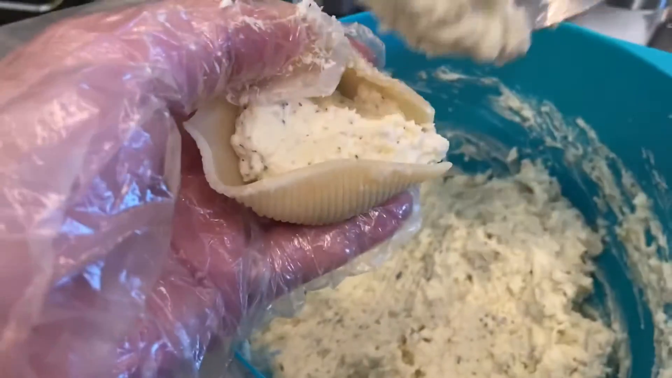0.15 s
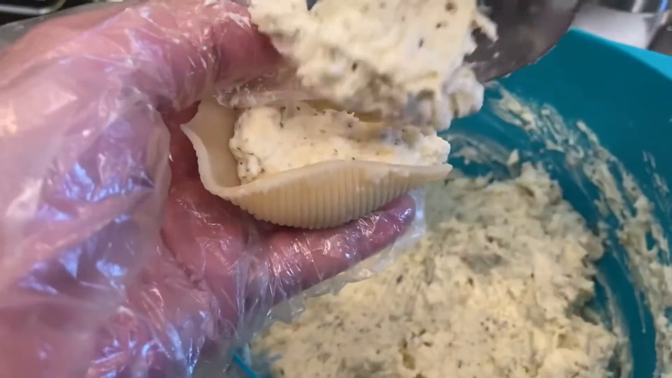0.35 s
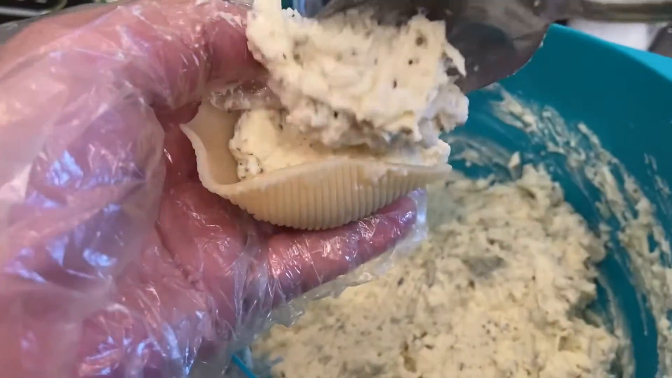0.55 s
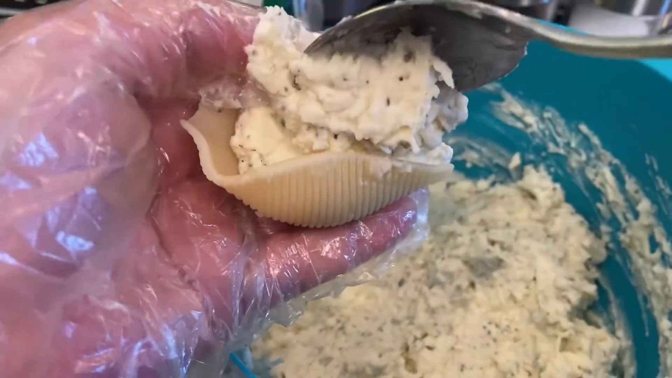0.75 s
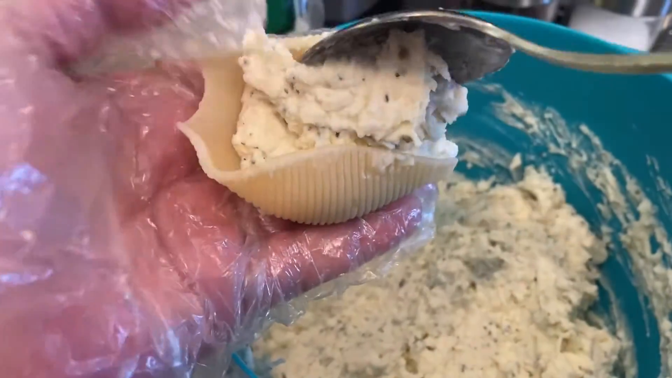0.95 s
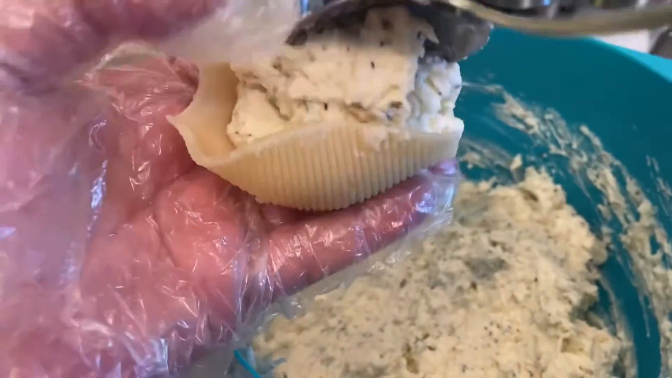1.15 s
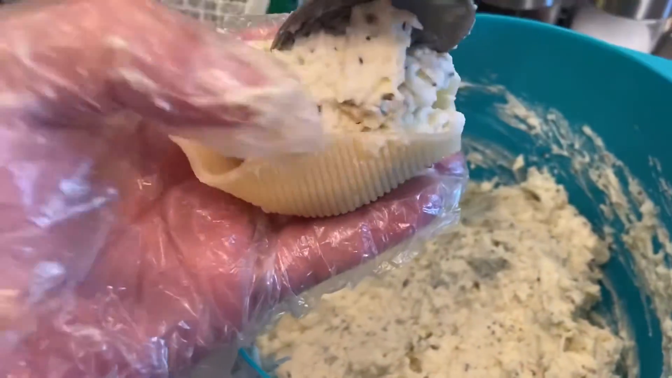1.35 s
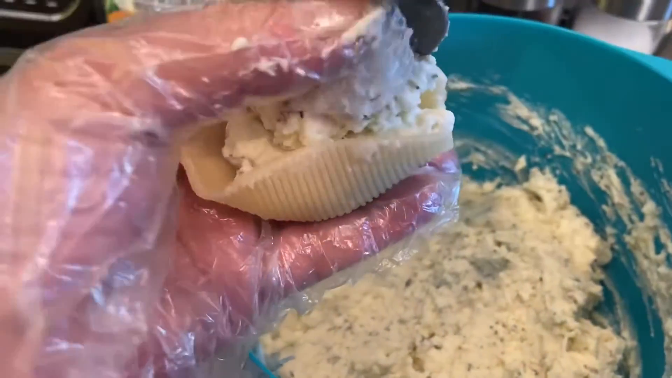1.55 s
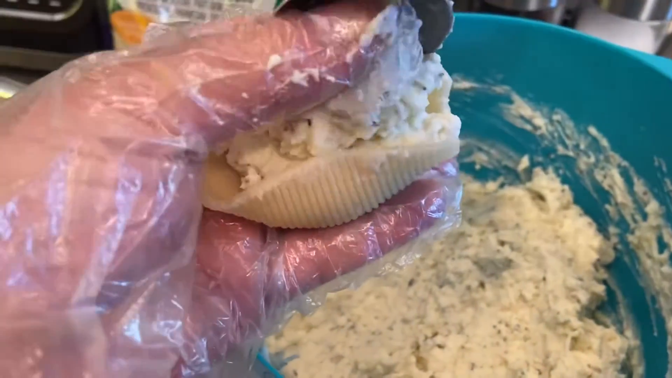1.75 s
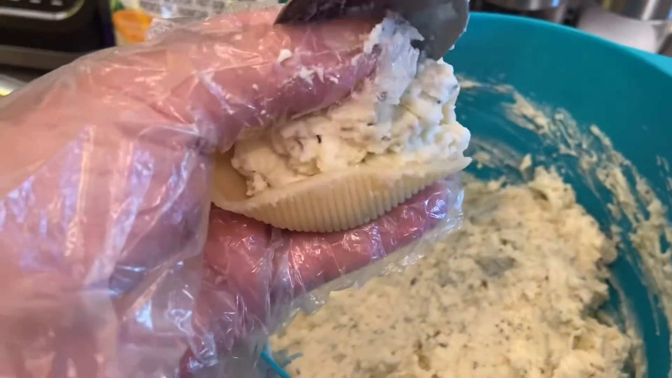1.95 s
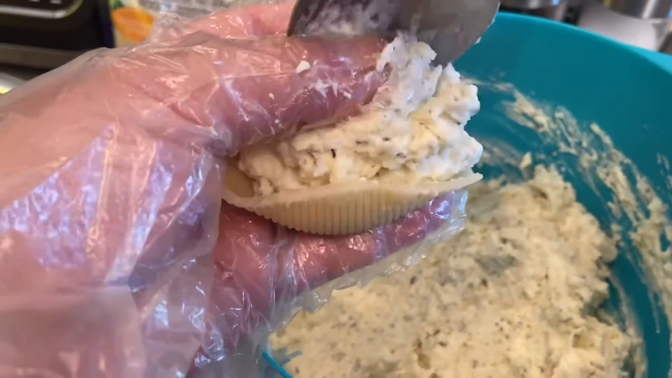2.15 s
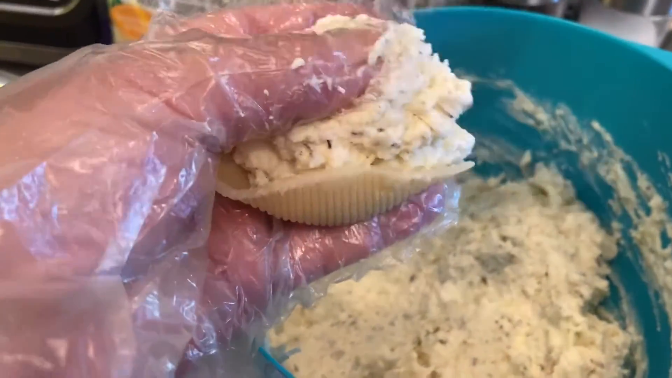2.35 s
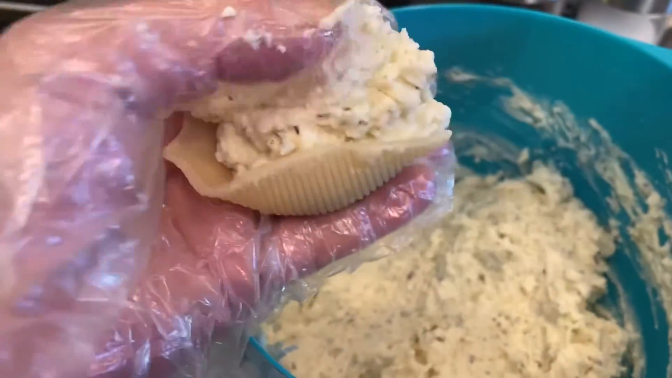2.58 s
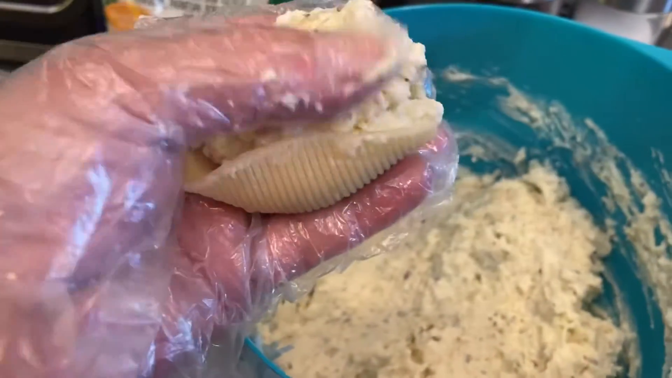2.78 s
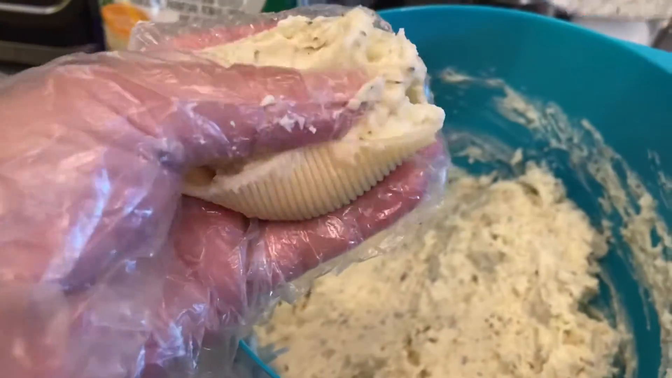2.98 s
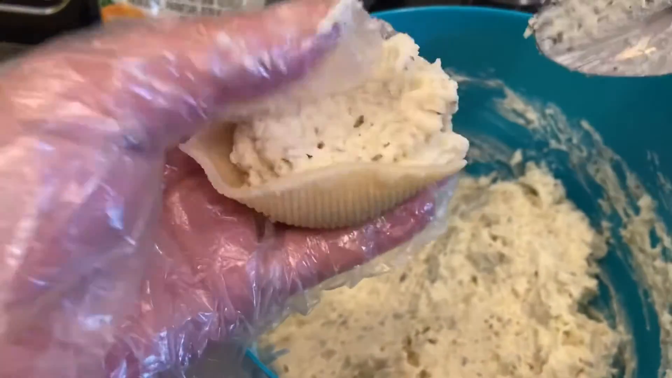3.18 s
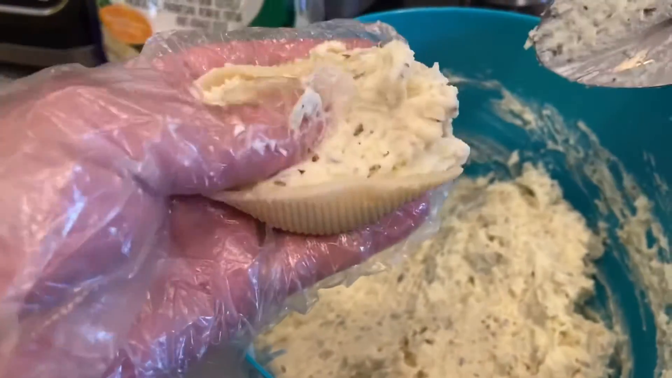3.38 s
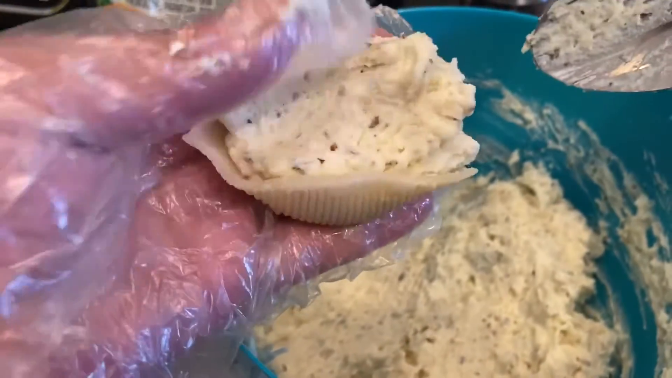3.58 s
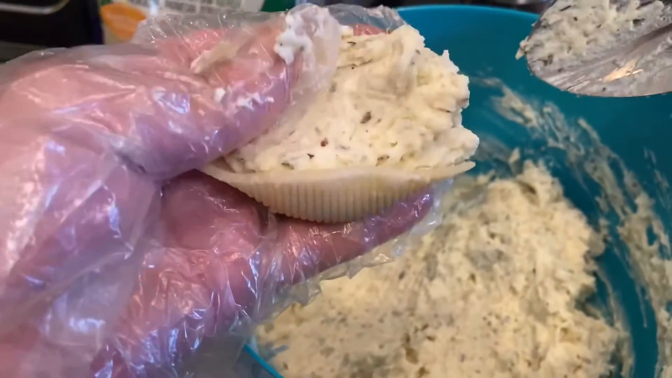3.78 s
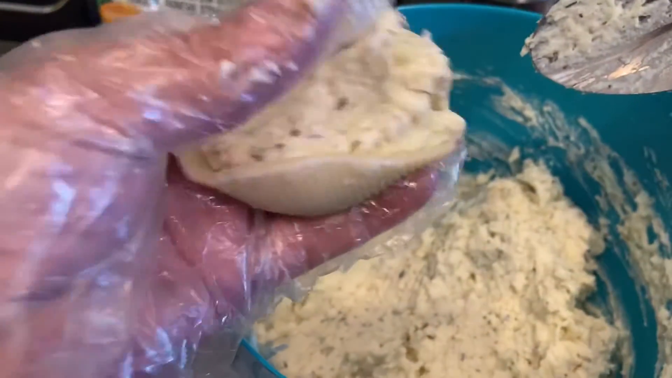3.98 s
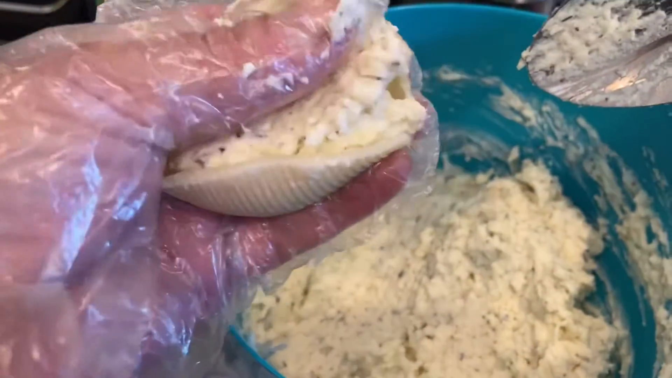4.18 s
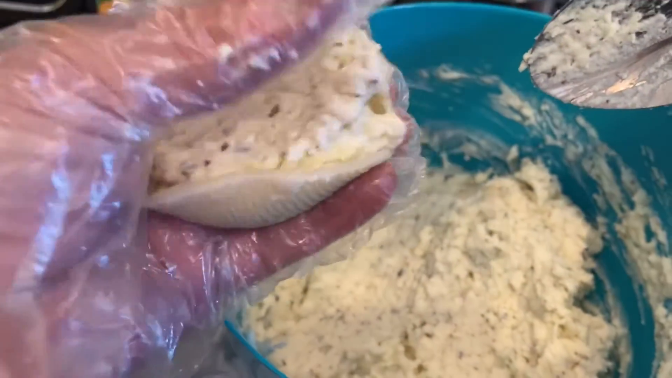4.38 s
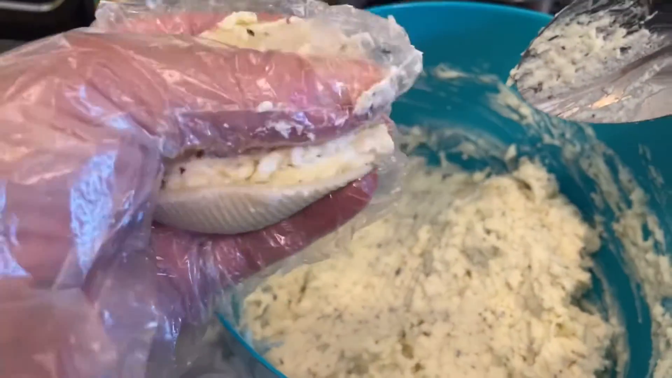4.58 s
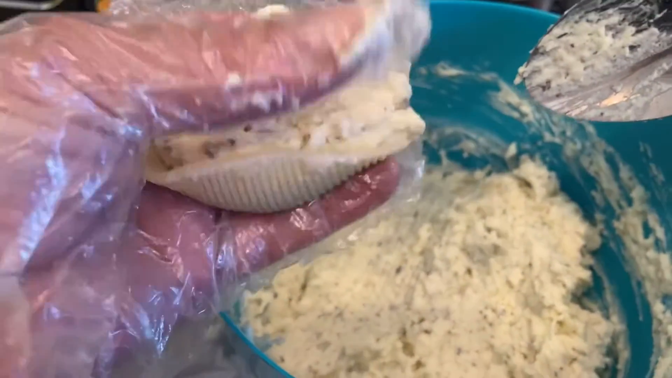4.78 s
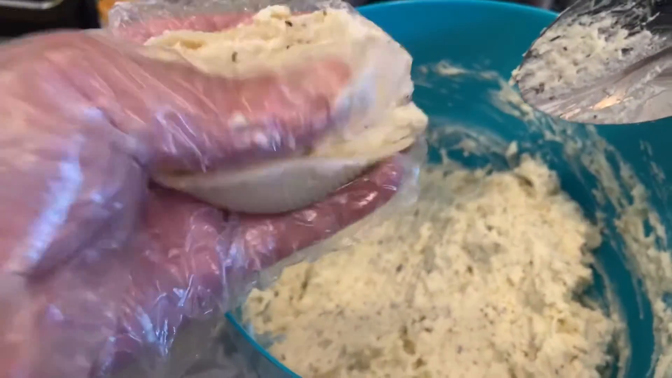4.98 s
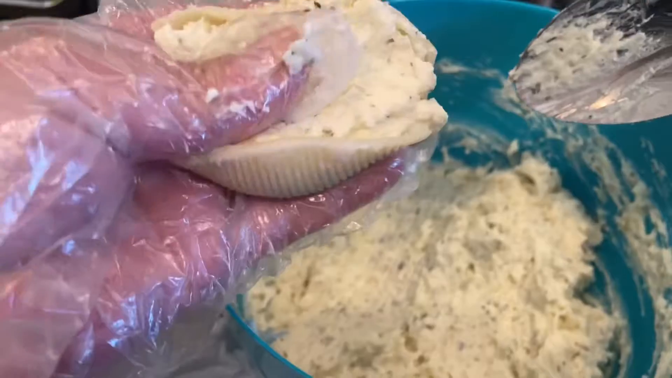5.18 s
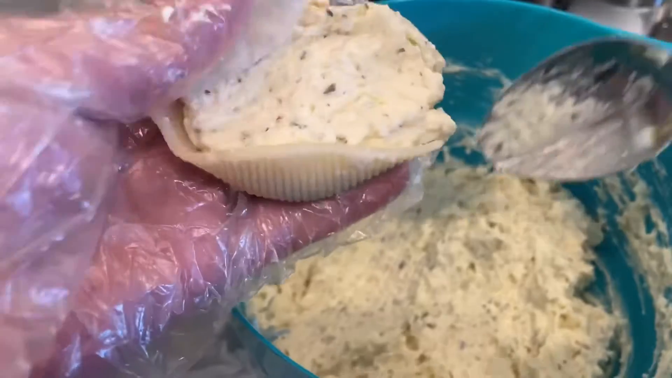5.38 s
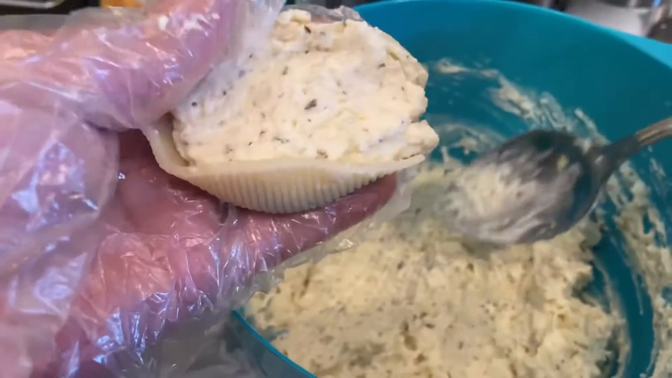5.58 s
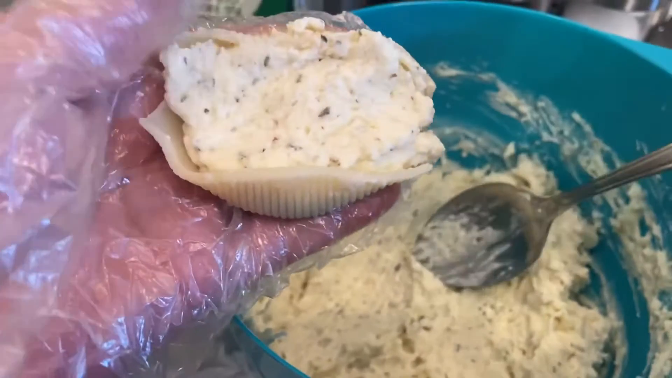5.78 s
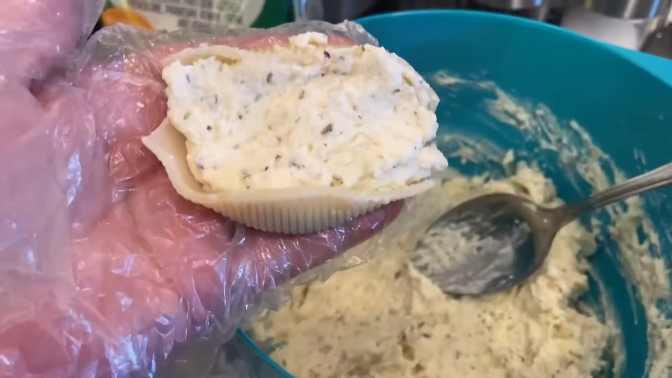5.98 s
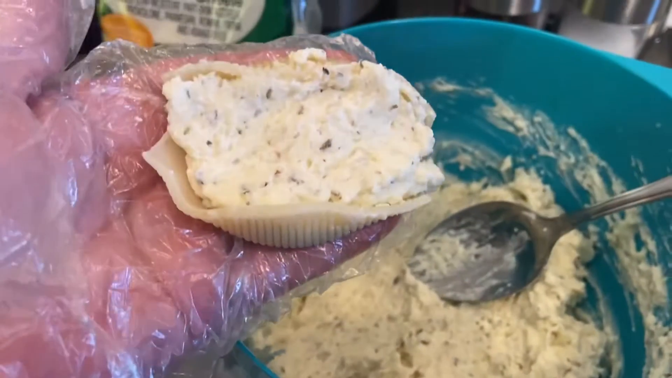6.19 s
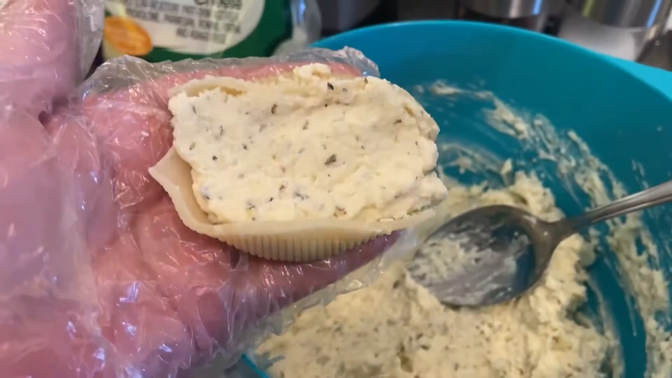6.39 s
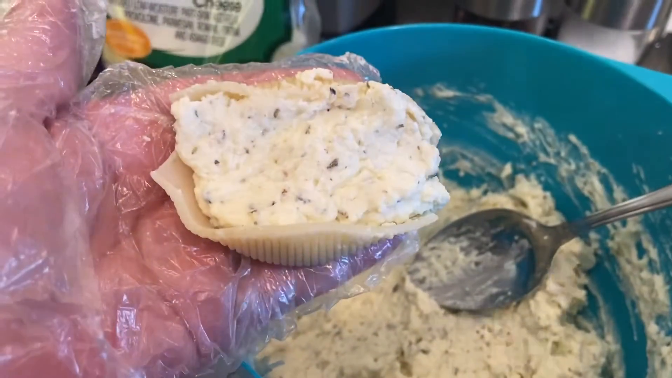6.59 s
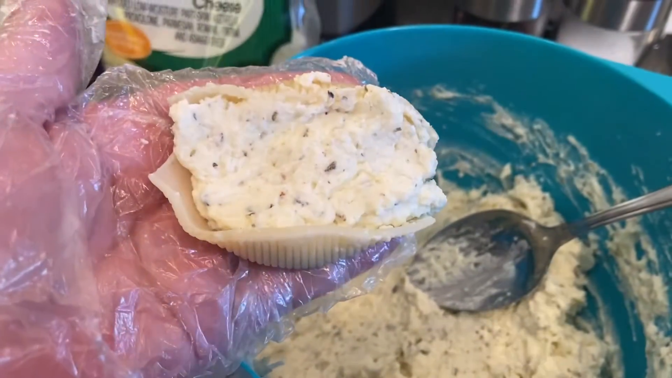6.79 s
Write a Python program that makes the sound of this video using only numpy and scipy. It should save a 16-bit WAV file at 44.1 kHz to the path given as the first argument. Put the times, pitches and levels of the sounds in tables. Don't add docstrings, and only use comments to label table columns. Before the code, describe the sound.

Thin plastic glove crackles and fizzes as a thumb smears thick cheese filling into a pasta shell, then a spoon knocks a plastic bowl.

```python
import sys
import numpy as np
from scipy import signal
from scipy.fft import rfft, irfft
from scipy.io import wavfile
from scipy.ndimage import uniform_filter1d

SR = 44100
rng = np.random.default_rng(int(sys.argv[2]) if len(sys.argv) > 2 else 0)


def generate_wav(signal):
    frames = np.transpose(np.atleast_2d(signal))
    scaled = np.clip(frames, -1, 1) * 32767
    pcm = np.round(scaled).astype(np.int16)
    wavfile.write(sys.argv[1], SR, pcm)


def field_ratio(decibels):
    return 10 ** (np.asarray(decibels, dtype=float) / 20)


N = 301644


def evened(x):
    return x / np.sqrt(np.mean(x ** 2) + 1e-20)


def column(rows, index):
    rows = np.asarray(rows)
    return np.interp(np.arange(N) / SR, rows[:, 0], rows[:, index])


def colour(x, points):
    hz, (f, db) = np.fft.rfftfreq(N, 1 / SR), np.transpose(points)
    gain_db = np.interp(np.log(hz + 1), np.log(f), db)
    return irfft(rfft(x, N) * field_ratio(gain_db), N)


def add(mix, s, sound):
    part = mix[round(s * SR):][:len(sound)]
    part += sound[:len(part)]


def resonate(x, hz, width):
    turn = np.exp(2j * np.pi * np.cumsum(hz) / SR)
    r = np.exp(-np.pi * width / SR)
    return 2 * (turn * signal.lfilter([1 - r], [1, -r], x / turn)).real


def room(x, t60):
    t = np.arange(SR // 4) / SR
    tails = rng.standard_normal((2, len(t))) * field_ratio(-60 * t / t60) * (1 - np.exp(-t / 0.00068))
    return signal.fftconvolve(x[None], tails / np.linalg.norm(tails[0]), axes=1)[:, :N]


# (time [s], level [dB])
APPLIANCE_LOAD = [(0.0, -58), (1.64, -57.5), (1.87, -57.5), (3.11, -57), (5.22, -60.5), (5.39, -60.5),
                  (6.36, -57.5), (6.84, -59)]
# (frequency [Hz], level [dB])
DEEP_RUMBLE = [(8.8, -63), (15, -61), (38, -2), (75, 1.5), (108, -6.5), (134, -8), (200, -12), (260, -69),
               (440, -120)]
UPPER_RUMBLE = [(65, -65), (110, 3.5), (198, -2.5), (302, -7.5), (440, -12.5), (560, -21), (659, -18.5),
                (1080, -32.5), (1200, -24), (1560, -63), (2640, -120)]
UPPER_DB, UPPER_FOLLOWS = -62, .3
# (frequency [Hz], width [Hz], level [dB])
HUM_LINES = [(90.4, 10.2, -62), (291, 15, -71.5), (324.2, 4, -70.5)]
# (frequency [Hz], level [dB])
HISS_COLOUR = [(300, 10.5), (1000, -4), (2000, 0.5), (5000, 3.5), (17000, -19.5)]
HISS_DB = -67


def kitchen():
    def pair(points, same):
        a, b = (evened(colour(rng.standard_normal(N), points)) for _ in "ab")
        return same * a + np.sqrt(1 - same ** 2) * b * np.array([[1], [-1]])
    load_db = column(APPLIANCE_LOAD, index=1)
    upper_db = UPPER_DB + UPPER_FOLLOWS * (load_db + 59.5)
    out = field_ratio(load_db) * pair(DEEP_RUMBLE, .98) + field_ratio(upper_db) * pair(UPPER_RUMBLE, 0.97)
    for hz, width, db in HUM_LINES:
        line = [(hz - 3 * width, -60), (hz - width / 2, 0), (hz + width / 2, 0), (hz + 3 * width, -60)]
        out += field_ratio(db) * pair(line, 1.0)
    return out + field_ratio(HISS_DB) * pair(HISS_COLOUR, 0.21)


# (peak time [s], rustle level [dB], rise [s], fall [s])
STROKES = [(2.52, -51, 0.031, 1), (2.67, -46, 0.3, 0.15), (2.85, -49, 0.57, 0.4), (3.12, -38.5, 0.13, 0.14),
           (3.246, -42.5, 0.026, 0.35), (3.35, -52.5, 0.42, 0.068), (3.525, -41.5, 0.1, 0.24),
           (3.69, -41.5, 0.11, 0.094), (3.75, -49, 0.18, 0.23), (3.916, -41, 0.071, 0.11),
           (4.03, -48, 0.17, 0.49), (4.132, -43, 0.062, 0.11), (4.343, -40, 0.054, 0.13),
           (4.52, -45, 0.36, 0.22), (4.749, -43.5, 0.097, 0.15), (4.915, -47, 0.19, 0.16),
           (5.051, -42, 0.073, 0.23), (5.18, -43.5, 0.12, 0.17), (5.372, -39, 0.088, 0.056),
           (5.456, -45, 0.15, 0.16), (5.669, -51.5, 0.11, 0.26)]
# (peak time [s], rustle level [dB], rise [s], fall [s])
GRIP_SHIFTS = [(.09, -56.5, 0.3, 0.47), (.47, -59, 0.45, 0.038), (.555, -60, 0.16, 0.45),
               (.748, -50.5, 0.094, 0.22), (.89, -57, 0.1, 0.28), (.95, -49, 0.3, 0.13),
               (1.165, -52.5, 0.46, 0.3), (1.26, -55.5, 0.3, 0.031), (1.335, -53.5, 0.031, 0.74),
               (1.5, -52.5, 0.57, 0.39), (1.565, -55, 0.31, 0.07), (1.69, -50.5, 0.21, 0.16),
               (1.8, -54, 0.13, 0.37), (1.9, -57.5, 0.35, 1), (2.13, -61, 0.44, 0.82),
               (2.292, -52, 0.021, 0.071), (2.38, -59.5, 0.12, 0.17), (5.82, -60, 0.13, 1),
               (6.0, -53.5, 0.84, 0.37), (6.33, -70, .1, 0.21), (6.46, -62, 0.29, 0.13),
               (6.635, -84, .08, 0.044)]
# (peak time [s], rustle level [dB], length [s])
CRUMPLES = [(0.305, -61, 0.025), (0.398, -58, 0.025), (0.436, -63, 0.034), (0.448, -56, 0.027),
            (0.486, -52.5, 0.026), (0.561, -59, 0.039), (0.6, -54.5, 0.029), (0.632, -55, 0.025),
            (0.66, -57, 0.026), (0.672, -54, 0.025), (0.76, -54.5, 0.035), (0.888, -50.5, 0.04),
            (0.916, -56, 0.026), (1.034, -51.5, .04), (1.137, -47.5, 0.023), (1.386, -52, .04),
            (1.527, -50.5, 0.041), (1.73, -52.5, 0.036), (1.785, -52.5, .03), (1.853, -57.5, .03),
            (1.864, -61, 0.018), (1.888, -59, 0.037), (1.942, -52.5, .03), (2.185, -56.5, 0.035),
            (2.306, -47, 0.029), (2.399, -56, 0.061), (2.532, -62, 0.041), (3.265, -52, 0.023),
            (3.287, -51, .03), (3.508, -51, 0.06), (3.537, -40.5, 0.043), (3.595, -42, 0.033),
            (3.66, -45.5, 0.068), (3.7, -47, .02), (3.93, -39.5, .04), (4.767, -43.5, 0.079),
            (4.876, -46, .04), (5.074, -49, 0.068), (5.153, -46.5, .04), (5.333, -46, 0.025),
            (5.434, -47.5, 0.037), (5.954, -48, 0.043), (6.012, -64, 0.028), (6.123, -54, 0.04),
            (6.206, -65, 0.022), (6.28, -58.5, 0.039), (6.314, -60.5, .05), (6.357, -64, 0.039),
            (6.409, -60, 0.078), (6.49, -65, 0.034), (6.577, -67.5, 0.03), (6.64, -61.5, 0.023),
            (6.774, -65, 0.023)]
# (time [s], depth [dB], half width [s])
LIFTS = [(.525, 0.5, 0.036), (1.313, 9, 0.0041), (2.345, 2, 0.027), (2.455, 4.5, 0.039), (3.835, 5, .012),
         (3.86, 4, 0.011), (4.265, 6.5, 0.012), (5.295, 2.5, 0.033), (3.225, 0, 0.013), (6.558, 9, 0.011),
         (6.69, 4, .01), (6.79, 7, .015)]
SWING_DB, STILL_DB = 29.5, -87
CRUMPLE_RISE, ROUND = 0.44, 0.08


def effort():
    t = np.arange(0, N + 64, 64) / SR
    crumples = [(s, db, CRUMPLE_RISE * length, length) for s, db, length in CRUMPLES]
    peak, db, rise, fall = np.transpose(STROKES + GRIP_SHIFTS + crumples)[:, :, None]
    away = np.where(t < peak, (peak - t) / rise, (t - peak) / fall)
    away = np.hypot(away, ROUND) - ROUND
    power = (field_ratio(db - SWING_DB * away) ** 2).sum(axis=0) + field_ratio(STILL_DB) ** 2
    lifted_db = sum(db * np.exp(-.5 * ((t - s) / width) ** 2) for s, db, width in LIFTS)
    return np.interp(np.arange(N) / SR, t, 10 * np.log10(power) - lifted_db)


def grains(per_s, spread_db, low_hz, high_hz, count=13):
    clump = field_ratio(5.5 * evened(uniform_filter1d(rng.standard_normal(N), 260)))
    out, t = np.zeros(N), np.arange(256) / SR
    for hz, cycles in zip(np.geomspace(low_hz, high_hz, count), rng.uniform(.3, 1.3, count)):
        chance, size, sign = rng.random(N), rng.exponential(1, N), rng.choice([-1, 1], N)
        buckles = chance < clump * per_s / count / SR
        train = buckles * field_ratio(spread_db * np.minimum(size, 4)) * sign
        ring = np.sin(2 * np.pi * hz * t) * np.exp(-t * hz / cycles)
        out += hz ** .5 * signal.oaconvolve(train, ring / np.linalg.norm(ring))[:N]
    return evened(out)


# (frequency [Hz], level [dB])
FILM_COLOUR = [(500, -19), (1800, -7), (2800, -2), (3300, -8), (4000, -4), (5000, -3.5), (6500, -3),
               (11000, -1), (15600, -1.5), (17000, -25)]
PASTE_COLOUR = [(100, -8), (250, 2.5), (450, 6), (700, -5), (1100, 2.5), (1700, -14), (2600, 2),
                (4000, -34)]
# (time [s], paste against rustle [dB], hollow under the thumb [Hz], hollow against paste [dB])
WETNESS = [(0, -3.5, 1600, -24), (.15, -10, 2300, -12), (.4, -10, 2290, 8.5), (.63, -10.5, 2270, 6),
           (.69, -16, 2200, 0), (.72, -9.5, 1760, 10.5), (.81, -9.5, 1740, 3), (.84, -6.5, 1700, -7),
           (1.0, -4, 1600, -12), (1.65, -7, 1550, -16), (1.9, -28, 1700, -32), (2.5, -8.5, 1710, -10),
           (3.0, -13, 2070, -15), (4.2, -9.5, 1680, -20), (5.4, -10.5, 1420, -11), (5.7, -11, 1900, -9),
           (6.84, -2, 1500, -26)]
DRIER_PER_DB = 0.28
HOLLOW_WANDER, HOLLOW_DRIFT_S = .035, .03
TICKS_PER_S, TICK_SHARE = 420, .42


def rub():
    level_db = effort()
    share = np.clip(.5 - (level_db + 52.5) / 40, .3, .97)
    flicker = field_ratio(2.2 * evened(uniform_filter1d(rng.standard_normal(N), size=200)))
    fizz = np.sqrt(1 - share) * evened(flicker * rng.standard_normal(N))

    ticks = (rng.random(N) < TICKS_PER_S / SR) * rng.standard_normal(N)
    tick = rng.standard_normal(40) * np.exp(-np.arange(40) / 5)
    ticks = evened(signal.oaconvolve(ticks, tick)[:N])
    lone = TICK_SHARE * share ** 2
    crackle = np.sqrt(share - lone) * grains(2600, 1.9, 735, 15200)
    drive = fizz + crackle + np.sqrt(lone) * ticks
    film = field_ratio(6.5) * evened(colour(drive, FILM_COLOUR))

    span = round(HOLLOW_DRIFT_S * SR)
    drift = evened(uniform_filter1d(uniform_filter1d(rng.standard_normal(N), span), span))
    hz = column(WETNESS, index=2) * np.exp(HOLLOW_WANDER * drift)
    hollow = evened(resonate(resonate(drive * flicker ** 2, hz, 520), hz, 520))
    wet_db = column(WETNESS, index=1) - DRIER_PER_DB * (level_db + 54.5)
    body = evened(colour(drive, PASTE_COLOUR))
    paste = field_ratio(wet_db + 1.5) * (body + field_ratio(column(WETNESS, index=3)) * hollow)
    return field_ratio(level_db) * (film + paste)


# (time [s], peak level [dB], pitch [Hz], decay [s])
BUMPS = [
    (0.11, -41, 43, 0.078),
    (0.198, -31.5, 55, 0.016),
    (6.135, -43, 129, .02),
]


def bumps():
    out, t = np.zeros(N), np.arange(SR // 4) / SR
    for s, db, hz, decay in BUMPS:
        wobble = np.sin(2 * np.pi * hz * t) * np.exp(-t / decay) * (1 - np.exp(-t / 0.0057))
        add(out, s, field_ratio(db) * wobble)
    return out


# (time [s], peak level [dB], pitch [Hz])
SNAPS = [(0.2359, -41, 11500), (0.2952, -44, 7090), (0.3087, -42, 11600), (0.3416, -47, 10000),
         (0.3536, -42, 11300), (0.4015, -24.5, 8790), (0.408, -37, 6100), (0.4359, -44, 3890),
         (0.4815, -33, 5500), (0.449, -36, 4500), (0.5697, -34, 4440), (0.5382, -44, 4130),
         (0.5541, -37, 11500), (0.596, -41, 4660), (0.63, -41, 11000), (0.6584, -37, 10600),
         (0.707, -31, 10400), (0.7302, -29.5, 10600), (0.7397, -30, 4200), (0.8395, -29.5, 10800),
         (0.8774, -32, 4310), (0.8813, -28, 11000), (0.924, -34, 11200), (1.1312, -26.5, 10300),
         (1.1673, -27, 10900), (1.2032, -31, 11100), (1.2531, -31, 10600), (1.2785, -33, 11600),
         (1.325, -34, 11000), (1.332, -33, 3300), (1.5168, -27, 4300), (1.6192, -39, 11700),
         (1.6412, -31, 10900), (1.7649, -29, 11100), (1.7825, -31, 2640), (1.8522, -29, 6640),
         (1.8647, -31, 6710), (1.8841, -26.5, 7150), (1.9729, -32, 11800), (1.9869, -29, 10900),
         (2.004, -25.5, 11300), (2.0462, -39, 7400), (2.0637, -31, 10900), (2.093, -35, 10800),
         (2.1267, -29, 11100), (2.1655, -30, 10800), (2.1995, -27.5, 7900), (2.2189, -29, 10900),
         (2.2613, -38, 6710), (2.2922, -24, 7600), (2.357, -33, 7350), (2.441, -41, 7800),
         (2.4818, -42, 11200), (2.4976, -30, 10100), (2.5078, -33, 10500)]
STROKE_SNAPS = [(3.829, -31, 6500), (3.857, -34, 5200), (2.5073, -28, 10500), (2.6523, -36, 4730),
                (2.7073, -29.5, 7320), (2.8453, -22, 7200), (2.9717, -25, 11200), (3.07, -24, 5810),
                (3.1025, -16, 6000), (3.2397, -20.5, 5670), (3.2638, -17, 6140), (3.447, -35, 11200),
                (3.496, -32, 6250), (3.509, -20, 5500), (3.5123, -23, 5940), (3.645, -28, 10800),
                (3.674, -32, 11200), (3.6978, -19.5, 4000), (3.7375, -25.5, 6600), (3.7586, -29, 4830),
                (3.785, -29, 6410), (3.812, -29.5, 6300), (3.8457, -31, 6100), (3.871, -34, 11600),
                (3.8875, -32, 7320), (3.8882, -31, 10500), (3.9046, -21, 11300), (4.133, -30, 7140),
                (4.196, -27.5, 11000), (4.2783, -36.5, 10800), (4.2788, -40, 11400), (4.3117, -34, 7800),
                (4.318, -35, 11200), (4.3287, -39, 11300), (4.3323, -20, 7260), (4.3356, -26, 7010),
                (4.595, -25.5, 12000), (4.7198, -40, 11000), (4.7332, -38, 7850), (4.8649, -38, 12200),
                (4.874, -37, 11300), (4.9817, -32, 10600), (5.0136, -32, 10400), (5.0261, -37, 10400),
                (5.039, -30, 3900), (5.267, -30, 5300), (5.3197, -33, 6900), (5.3344, -30, 6980),
                (5.3573, -20, 11500), (5.4365, -26, 7450), (5.5305, -29, 6540), (5.5725, -35, 11000),
                (5.631, -42, 7050), (5.77, -32.5, 7640), (5.7933, -40, 11400), (5.8158, -29.5, 10400),
                (5.8525, -28, 10100), (5.949, -36, 11400), (6.012, -24.5, 11700)]
SETTLES = [(6.2555, -37, 3540), (6.277, -31, 8200), (6.306, -34, 11500), (6.321, -34, 8100),
           (6.344, -35.5, 3470), (6.3555, -37.5, 4770), (6.4014, -41, 10300), (6.492, -42.5, 4020),
           (6.527, -37, 10660), (6.54, -40, 9100), (6.5705, -37.5, 7100), (6.5765, -40, 11000),
           (6.5872, -44, 4000), (6.59, -41, 11500), (6.603, -45, 9000), (6.6145, -41, 9000),
           (6.6282, -28.5, 8100), (6.6378, -34, 7850), (6.66, -41.5, 3000), (6.7015, -40, 5150),
           (6.7204, -44, 2200), (6.741, -46, 4210), (6.772, -39, 8400), (6.809, -45, 5050),
           (6.823, -38.5, 10600), (6.829, -39, 6000)]
SNAP_DB, DULL_DB = 0.5, -23.5
RATTLE_DB, RATTLE_S = -17, 0.0056


def snaps():
    out, t = np.zeros(N), np.arange(900) / SR
    rows = [(s, db + SNAP_DB, hz) for s, db, hz in SNAPS + STROKE_SNAPS] + SETTLES
    chance = rng.standard_normal((len(rows), 4, len(t)))
    for (s, db, hz), (wide, dull, pitched, uneven) in zip(rows, chance):
        rattle_db = RATTLE_DB + 7.1 * evened(uniform_filter1d(uneven, size=30))
        rattle = field_ratio(rattle_db) * np.exp(-t / RATTLE_S)
        fall = (np.exp(-t / 0.00081) + rattle) * (1 - np.exp(-t / 0.00026))
        ring = 0.5 * evened(resonate(pitched, hz + 0 * t, 1200))
        ring += 0.68 * evened(np.diff(wide, prepend=0))
        pop = evened(uniform_filter1d(dull, size=12) - uniform_filter1d(dull, size=60)) * field_ratio(DULL_DB)
        add(out, s, field_ratio(db - 2.5) * fall * (ring + pop))
    return out


# (time [s], peak level [dB], pitch [Hz])
SQUELCHES = [(0.875, -46, 1100), (0.963, -45, 850), (1.029, -50, 850), (1.327, -48, 643), (1.413, -49, 668),
             (1.46, -47, 1000), (1.941, -52, 781), (1.979, -45, 760), (2.164, -62, 1300),
             (2.199, -61, 1110), (2.298, -50, 503), (2.419, -51, 697), (2.832, -52, 634), (3.11, -43, 1090),
             (3.273, -38, 1050), (3.58, -48, 896), (3.813, -42, 1080), (3.905, -39.5, 1080),
             (4.068, -43, 1010), (4.327, -54, 1170), (4.462, -46, 970), (4.753, -40, 1170),
             (4.917, -53, 895), (5.042, -45, 1030), (5.364, -34.5, 988), (5.44, -36.5, 1060),
             (6.018, -45, 524)]


def squelches():
    out, t = np.zeros(N), np.arange(1500) / SR
    chance = rng.standard_normal((len(SQUELCHES), len(t)))
    for (s, db, hz), noise in zip(SQUELCHES, chance):
        pitch = hz + 0 * t
        pocket = evened(resonate(resonate(noise, pitch, 260), pitch, 260))
        add(out, s, field_ratio(db - 1.5) * pocket * np.exp(-t / 0.009) * (1 - np.exp(-t / 0.0015)))
    return out


# (frequency [Hz], left lag [turns], left-right likeness [0-1], left-right balance [dB])
HAND_PORTS = [(0, 0, .95, 0), (600, -.15, .6, 3), (1400, -.3, .5, 4), (2600, -.4, .3, 9), (3400, 0, .75, 3),
              (5600, 0, .5, 2), (6900, 0, .85, 0), (15500, 2, .85, 0), (22050, 3.5, .85, 0)]


def ports(x, other):
    f, *columns = np.transpose(HAND_PORTS)
    turns, same, balance_db = (np.interp(np.fft.rfftfreq(N, 1 / SR), f, c) for c in columns)
    right = same * np.exp(2j * np.pi * turns) * rfft(x) + np.sqrt(1 - same ** 2) * rfft(other)
    return np.array([x, irfft(right * field_ratio(-balance_db), N)])


def glove():
    hz, t, z = signal.stft(rub() + snaps() + squelches(), SR, nperseg=256)
    colours, paths = rng.standard_normal((2, len(hz), len(t)))
    colours = evened(uniform_filter1d(uniform_filter1d(colours, size=5, axis=0), size=24, axis=1))
    paths = evened(uniform_filter1d(uniform_filter1d(paths, size=2, axis=0), size=12, axis=1))
    z = z * field_ratio(1.2 * colours)
    near = signal.istft(z, SR, nperseg=256)[1][:N]
    scattered = signal.istft(z * np.exp(2.5j * paths), SR, nperseg=256)[1][:N]
    return ports(near, scattered) + field_ratio(-16) * room(near, 0.08)


# (time [s], peak level [dB], pitch [Hz])
PRESSES = [(1.035, -56, 282), (1.214, -52, 212), (1.381, -50, 417), (2.131, -70, 151), (2.599, -48.5, 444),
           (2.653, -46.5, 380), (3.517, -51, 406), (3.909, -48, 413), (4.351, -45.5, 246),
           (4.872, -53, 367), (5.113, -53, 420), (5.362, -46, 393), (5.456, -55, 317), (6.016, -46, 291),
           (6.3, -49.5, 296), (6.4, -60, 324), (6.459, -51, 303), (6.62, -63, 293)]


def presses():
    out, t = np.zeros(N), np.arange(4000) / SR
    chance = rng.standard_normal((len(PRESSES), len(t)))
    for (s, db, hz), noise in zip(PRESSES, chance):
        thump = evened(resonate(noise, hz + 0 * t, 88))
        add(out, s, field_ratio(db - 1.0) * thump * np.exp(-t / 0.039) * (1 - np.exp(-t / 0.0024)))
    return colour(out, [(60, -16.5), (150, 3.0), (700, -6.5), (1500, -16)])


# (time [s], level [dB], contact [s])
SPOON_BLOWS = [
    (6.10925, -10, 0.000055),
    (6.1160, -21, .00008),
    (6.1200, -27, .0001),
    (6.1240, -20, .00009),
    (6.1298, -25, 0.000065),
    (6.1400, -33, .0001),
    (6.194, -42, .00015),
    (6.2775, -47, .0001),
]
# (frequency [Hz], level [dB], t60 [s])
BOWL_MODES = [(297, -24, 0.065), (433, -29.5, 0.14), (730, -32.5, 0.075), (1245, -15.5, 0.07),
              (1340, -12.5, 0.054), (1300, -16.5, 0.055), (1600, -32.5, 0.02), (2056, -16, 0.056),
              (2110, -8, 0.038), (2200, -8, 0.035), (2275, -10.5, 0.045), (2410, -9, 0.039),
              (2600, -13.5, 0.03), (2860, -16, 0.037)]
SPOON_MODES = [(1330, -40.5, .4), (1332, -44, 0.45), (1993, -24, .11), (2340, 2, 0.0061), (2570, -31, 0.13),
               (3300, -15.5, 0.029), (3540, -19, 0.022), (4130, -15, 0.031), (4300, -19, 0.017)]
# (frequency [Hz], level [dB])
CRACK_COLOUR = [(500, -31), (1200, -41), (2200, 6), (3200, -11.5), (4300, 8), (5200, -41.5)]
# (frequency [Hz], left-right balance [dB])
BOWL_BALANCE = [(60, -2), (380, 8), (700, 8), (1290, -5), (1700, 0), (2300, 3.5), (2900, 7), (4400, 2)]
# (frequency [Hz], level [dB])
WALLS = [(300, 13.5), (1300, 4), (2300, -1.5), (3500, 5.5), (6000, -16)]


def spoon():
    blows, t, u = np.zeros(N), np.arange(SR // 3) / SR, np.arange(-30, 31) / SR
    for s, db, contact in SPOON_BLOWS:
        pulse = np.exp(-.5 * (u / contact) ** 2) / (contact * SR * 3.2)
        add(blows, s - 30 / SR, -field_ratio(db) * pulse)
    body = np.zeros(len(t))
    for hz, db, t60 in BOWL_MODES + SPOON_MODES:
        body += field_ratio(db - 60 * t / t60) * np.sin(2 * np.pi * hz * t) * (1 - np.exp(-t * hz / 1.3))
    crack = evened(colour(rng.standard_normal(N), CRACK_COLOUR))[:len(t)] * np.exp(-t / 0.003)
    dry = signal.oaconvolve(blows, body + field_ratio(-17) * crack)[:N]
    half = [(hz, db / 2) for hz, db in BOWL_BALANCE]
    pair = np.array([colour(dry, half), colour(dry, [(hz, -db) for hz, db in half])])
    return pair + field_ratio(-11) * room(colour(dry, WALLS), 0.31)


def scene():
    return kitchen() + glove() + bumps() + presses() + spoon()


# (low edge [Hz], high edge [Hz], sign of right channel [+-1],
# share of frames [0-1])
SHARED_BANDS = [(3300, 4700, 1, .5), (4700, 6400, 1, .15), (6400, 7500, 1, 1), (8350, 9600, -1, 1),
                (9600, 9900, -1, .2), (10500, 11700, 1, 1), (12500, 13800, -1, 1), (14700, 17000, 1, 1)]
# (start [s], end [s])
APART = [(.1, .14), (.2, .24), (.3, .48), (.6, .88), (.98, 1.02), (1.12, 1.17), (1.28, 1.33), (1.84, 2.24),
         (2.3, 2.42), (2.5, 2.54), (2.68, 2.73), (3.82, 3.87), (4.23, 4.33), (4.96, 5.0), (5.53, 5.6),
         (5.79, 5.86), (6.0, 6.02), (6.14, 6.4), (6.5, 6.84)]
REJOIN = .18


def fold(x):
    hz, t, z = signal.stft(x, SR, nperseg=1024)
    together = ~np.any([(a < t) & (t < b) for a, b in APART], axis=0)
    together |= (rng.random(len(t) // 2 + 1) < REJOIN).repeat(2)[:len(t)]
    chance = rng.random((len(hz) // 10 + 1, len(t) // 3 + 1))
    chance = chance.repeat(10, axis=0).repeat(3, axis=1)[:len(hz), :len(t)]
    for low, high, sign, share in SHARED_BANDS:
        joined = ((low < hz) & (hz < high))[:, None] & together & (chance < share)
        z[1] = np.where(joined, sign * z[0], z[1])
    return signal.istft(z, SR, nperseg=1024)[1][:, :N]


def top_cut(x):
    return signal.sosfilt(signal.butter(12, 16960, fs=SR, output="sos"), x)


# (frequency [Hz], level [dB])
BAND_EDGE = [(15700, 1), (16100, -39), (17000, -40), (17400, -100)]


def record(dry):
    limited = np.array([colour(x, BAND_EDGE) for x in dry])
    return top_cut(fold(limited))


dry = scene()
out = record(dry)
generate_wav(out)
```